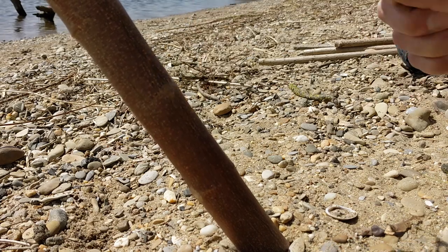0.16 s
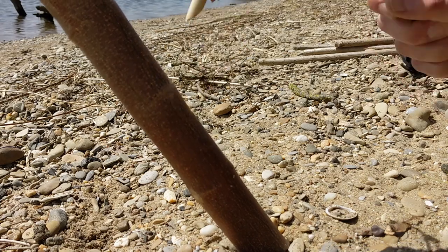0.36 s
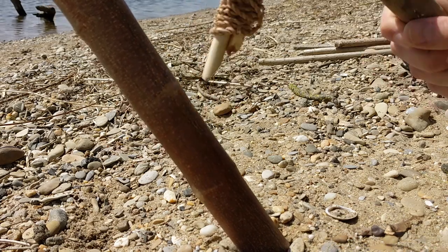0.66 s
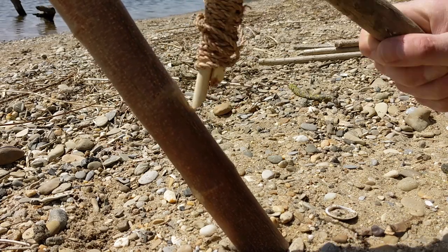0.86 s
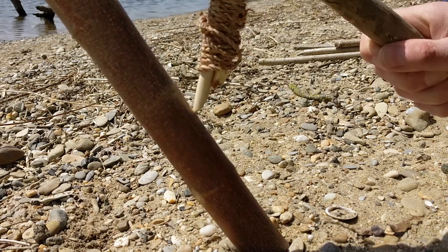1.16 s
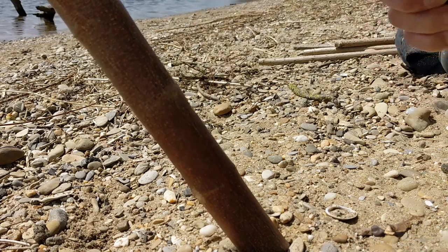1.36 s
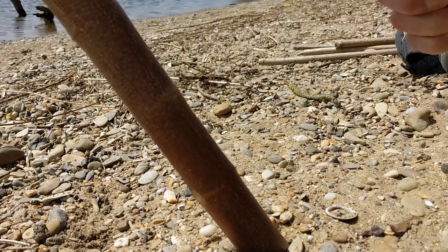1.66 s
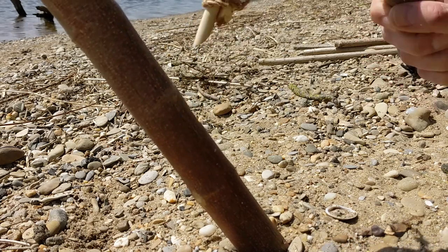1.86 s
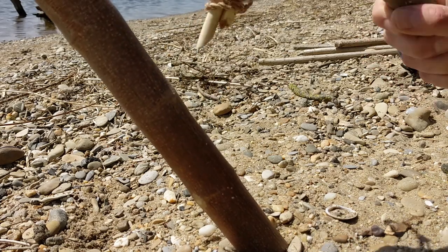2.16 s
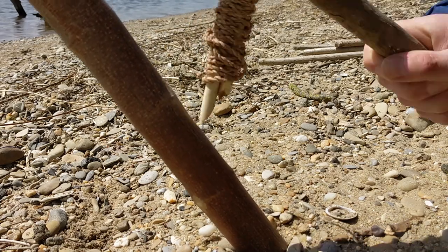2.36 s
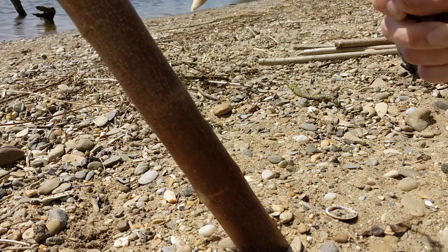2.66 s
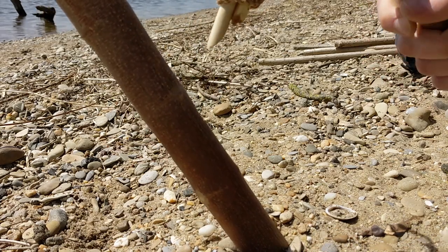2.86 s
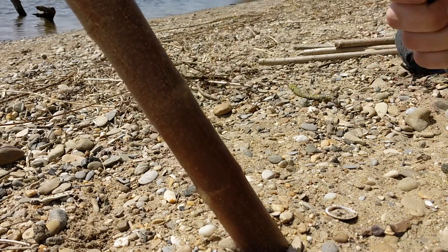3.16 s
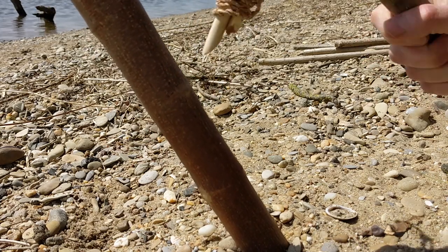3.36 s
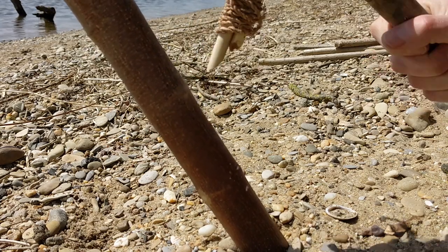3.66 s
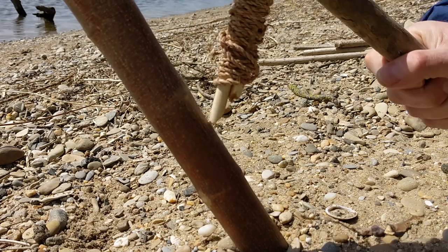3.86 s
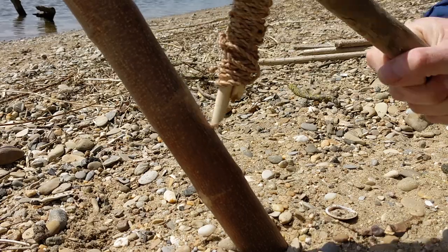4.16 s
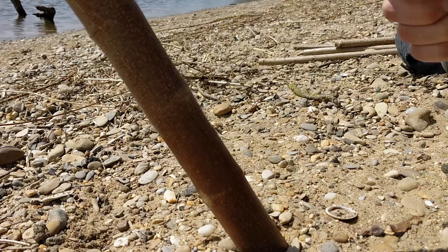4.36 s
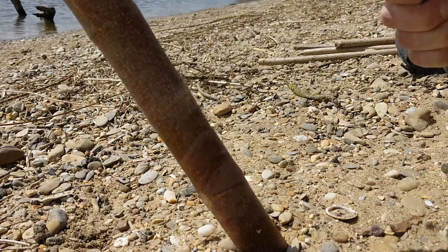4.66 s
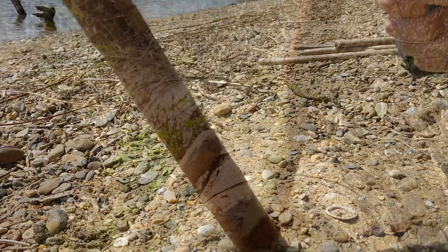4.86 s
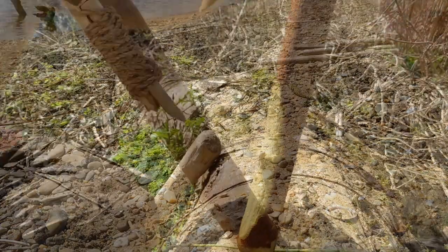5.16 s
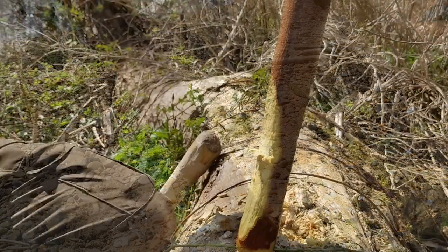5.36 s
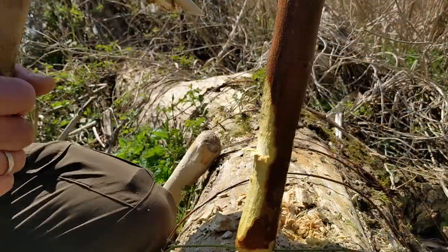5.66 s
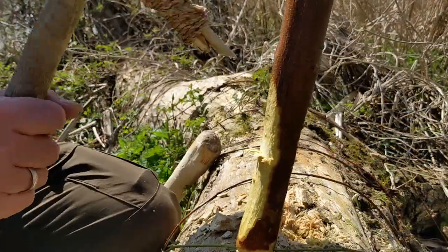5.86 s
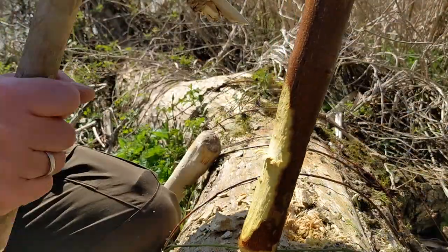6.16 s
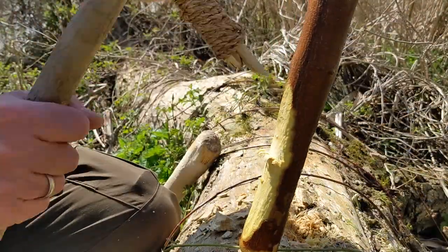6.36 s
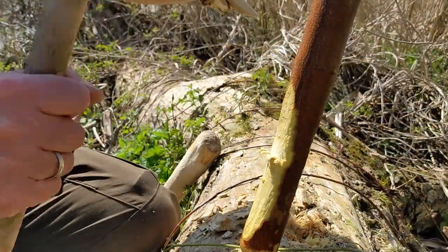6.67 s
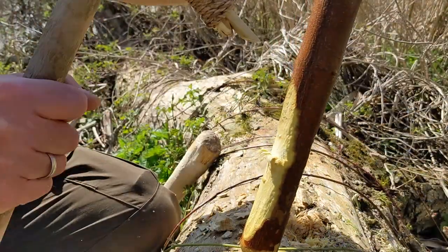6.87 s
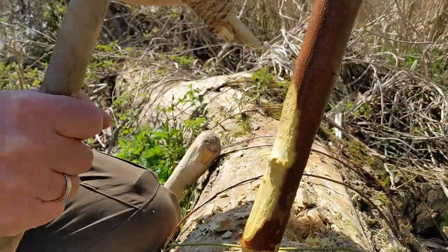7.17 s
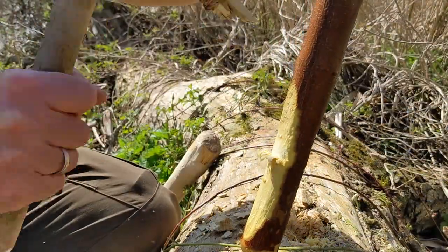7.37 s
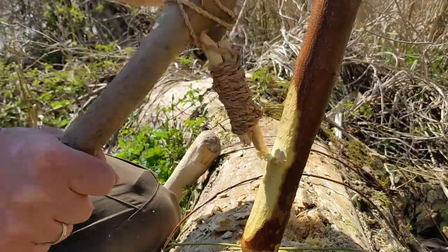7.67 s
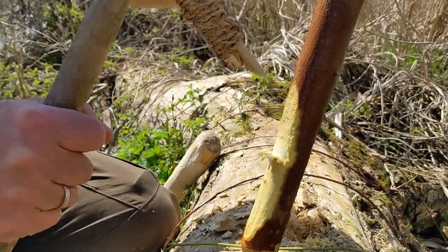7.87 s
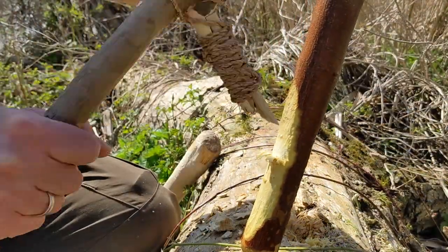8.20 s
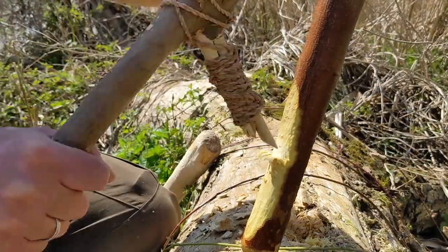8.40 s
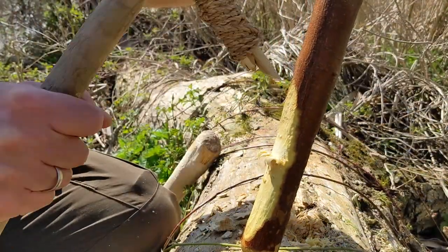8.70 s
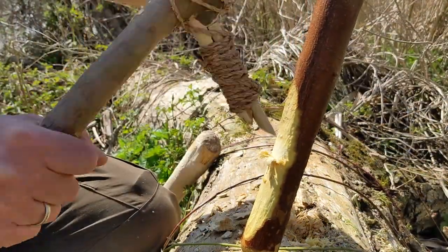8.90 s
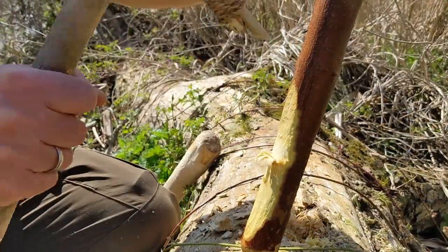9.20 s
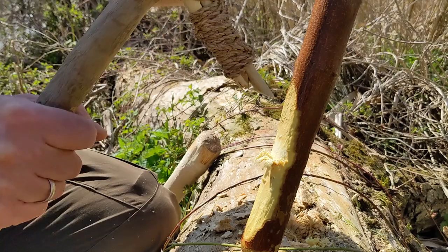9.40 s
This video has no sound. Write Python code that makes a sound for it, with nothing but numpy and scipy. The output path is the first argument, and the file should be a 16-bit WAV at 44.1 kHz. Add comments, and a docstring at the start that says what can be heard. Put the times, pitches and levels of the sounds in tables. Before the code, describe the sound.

A bone adze chops a wooden pole close by, about three strikes a second, each a bright crack with a short knock. Chips patter and the pole scrapes lightly in the shingle during a brief pause. The strikes fade out, then return faster, with a fuller, hollower knock as the pole stands on a log. Behind them is only a soft outdoor rumble and hiss, with a few faint, distant bird notes.

```python
"""A bone adze chops a wooden pole, first on a shingle beach, then, after a lull, on a fallen log.
Each bite snaps fibres, which ring blade and haft; the blow rings the pole's bending modes as a
knock and a thud. How the pole is held sets the thud's pitch and the balance of the parts.
Chips fall, sand trickles, the pole bumps and grinds in the grit.
Far birds call over a soft outdoor rumble and hiss."""
import sys
import numpy as np
from scipy import signal
from scipy.fft import rfft, irfft
from scipy.io import wavfile
from scipy.ndimage import uniform_filter1d

SR = 44100
rng = np.random.default_rng(int(sys.argv[2]) if len(sys.argv) > 2 else 0)


def store_pcm(level_fs):
    """Save levels as 16-bit WAV."""
    pcm = np.round(np.clip(level_fs, -1, 1) * 32767).astype(np.int16)
    wavfile.write(sys.argv[1], SR, np.atleast_2d(pcm).T)


N = 420713
SIZE, LEAD = 16384, 1024  # samples per event, samples before contact
AGE_S = (np.arange(SIZE) - LEAD) / SR  # time since contact
SIDES = np.array([[1], [-1]])  # left, right
PRESS_S, ON_LOG_S = 2.9, 5.7  # pole pressed into the shingle, pole stood on the log

# stereo phase on the beach: freq_hz, left_lead_rad
BEACH_PHASE = [(100, 0), (900, .3), (1700, 2), (2400, -1), (3100, -5), (3700, -4.8), (4300, -2.8),
               (6000, -2.8), (7600, -6.2), (11500, -3.8), (13500, -2.5), (15000, -.8)]


def beach_chop(bite_ms, pole_hz, thud_db, low_db, high_db, haft_db, crack_db, treble_db):
    """Blow on shingle: the stones damp the pole and scatter the crack brightly."""
    # cut through dry bark: freq_hz, gain_db
    bark = [(300, -13.5), (950, -11), (1300, -0.5), (1800, -5.5), (2500, 5.5), (4000, 1.5), (5200, -2),
            (6200, 0.5), (9000, -7), (12500, -10.5), (15000, -5.5), (16000, -12)]
    # low and high pole modes on shingle: freq_hz, level_db, t60_s, left_minus_right_db
    low_modes = [(268, -8, 0.013, -0.5), (388, -3.5, 0.033, -1), (472, 2, 0.035, 4.5)]
    high_modes = [(584, -1, 0.041, -2.5), (694, -8, 0.01, 5.5), (794, 3.5, .02, 11.5)]
    crack = bite(bark, bite_ms, haft_db, crack_db, treble_db, rise=.7, fall=.34)
    crack = stereo_phase(crack, BEACH_PHASE)
    low = knock(low_modes, low_db, push_s=-.0011, rebound_s=.0027, rebound_gain=.21)
    high = knock(high_modes, high_db - 2, push_s=-.00072, rebound_s=.0014, rebound_gain=.43)
    swing = thud(pole_hz, t60_s=7.5 / pole_hz, swell_s=7.4 / pole_hz, ground_gain=.2,
                 glide=308 / pole_hz - 1, glide_s=1.45 / pole_hz)  # falls from 308 Hz
    direct = crack + low + high
    stones = scatter(direct, t60_s=.1, db=-26, delay_s=.0057, lo_hz=1400, hi_hz=14900)
    shore = scatter(direct, t60_s=.35, db=-44.5, delay_s=.018, lo_hz=4000, hi_hz=12000)
    return direct + burst(swing, thud_db + .5) + stones + shore + chips(crack_db - 28.5)


def log_chop(bite_ms, pole_hz, thud_db, low_db, high_db, haft_db, crack_db, treble_db):
    """Blow on the log: the pole rings longer and hollower; brush returns a faint echo."""
    # cut through bare wood: freq_hz, gain_db
    bare_wood = [(300, -11.5), (900, 0), (1200, 0), (1700, -5.5), (2500, 6), (4000, 1.5), (6000, -3.5),
                 (8500, -0.5), (10500, -9.5), (12500, -10.5), (15000, -17), (16000, -20)]
    # stereo phase by the log: freq_hz, left_lead_rad
    log_phase = [(100, 0), (1300, .3), (1900, .6), (2200, 2), (2800, 1.6), (3200, -.5), (4100, -.8),
                 (4700, .8), (6000, -2), (7000, -4), (9000, -2), (11500, -1), (14000, .5)]
    # low and high pole modes on the log: freq_hz, level_db, t60_s, left_minus_right_db
    low_modes = [(249.3, -4, .07, 4.5), (284, -5, 0.051, 2.5), (358, -0.5, .065, -6),
                 (433, 3.5, 0.039, 8.5)]
    high_modes = [(612, -3, 0.05, 0), (744, 0.5, 0.031, -2), (751.3, 2.5, 0.035, -2), (866, -11, 0.006, 0)]
    crack = bite(bare_wood, bite_ms, haft_db, crack_db, treble_db, rise=.59, fall=.67)
    crack = stereo_phase(crack, log_phase)
    low = knock(low_modes, low_db + 2, push_s=-.00023, rebound_s=.002925, rebound_gain=.97)
    high = knock(high_modes, high_db - .3, push_s=-.00085, rebound_s=.005332, rebound_gain=.99)
    # the pole's foot crunches on the log's bark
    crunch = band(rng.standard_normal((2, SIZE)) * (fade(.05) - fade(.008)), 380, 950, order=2)
    swing = thud(pole_hz, t60_s=.14, swell_s=.05, ground_gain=.65, glide=1.5, glide_s=.003)
    swing = burst(swing, thud_db - 5) * undb(SIDES * -1.9)
    direct = crack + low + high + burst(crunch, high_db - 8)
    trunk = scatter(direct, t60_s=.035, db=-20.5, delay_s=.0022, lo_hz=500, hi_hz=2940)
    outward = colour(direct, [(1950, 0), (2320, -8), (2700, 0)])  # notch at the haft's ring
    brush = scatter(outward, t60_s=.063, db=-31, delay_s=.007, lo_hz=300, hi_hz=12000)
    echo = scatter(outward, t60_s=.12, db=-42, delay_s=.036, lo_hz=2200, hi_hz=3976)
    return direct + swing + trunk + brush + echo + chips(crack_db - 35)


def share_out(bite_ms, crack_db, knock_db, hold):
    """Pole pitch and part levels for one blow; a longer bite tears more fibres, adding treble."""
    pole_hz, thud_db, low_db, high_db, haft_db, treble_db = hold
    torn_db = 1.4 * np.log2(bite_ms / 1.8)
    return (pole_hz, knock_db + thud_db, knock_db + low_db, knock_db + high_db,
            crack_db + haft_db, crack_db, crack_db + treble_db + torn_db)


def bite(spectrum, bite_ms, haft_db, crack_db, treble_db, rise, fall):
    """Fibres snap as the edge sinks in, ringing blade and haft; rise and fall are in bite lengths."""
    # modes of the buried blade and of the haft: freq_hz, level_db, t60_s, left_minus_right_db
    blade_modes = [(2780, -2, .01, 4), (3330, -3, .009, -2), (4500, -6, .012, -4), (5250, -1, .011, 8),
                   (6790, 3, .022, -8), (7130, 0, .016, 4), (9530, -2, .016, -7), (11550, 1, .012, -7),
                   (14400, 1, .007, -6)]
    haft_modes = [(2320, 0, .012, 7), (2480, -6, .009, -3)]
    depth = AGE_S * 1000 / bite_ms
    envelope = np.exp(-np.where(depth < 0, np.abs(depth / rise) ** 1.2, np.abs(depth / fall)))
    # surface scratch before, parting splinters after
    envelope += .2 * np.exp(-np.abs(AGE_S) / np.where(AGE_S < 0, .0022, .003))
    envelope *= np.interp(depth, [-3, -1.2, -.8], [.55, .7, 1])
    snaps = grit(SIZE, spread_db=1.5) + .93 * rng.standard_normal((2, SIZE))
    force = colour(envelope * snaps, spectrum)
    blade = 0
    for hz, db, t60_s, pan_db in blade_modes:
        gain = undb(db + SIDES * pan_db / 2) * 2 * np.log(1000) / (t60_s * SR)
        blade += gain * fade(t60_s) * np.cos(2 * np.pi * hz * AGE_S)
    cut = force + through(force, blade)
    crack = colour(cut, [(6500, 0), (7500, -6), (9000, -40)])
    treble = (cut - crack) * undb(SIDES * -1.5)
    haft = through(force, ringing(haft_modes, spread_db=2, detune=.026))
    return burst(crack, crack_db) + burst(haft, haft_db + 3.5) + burst(treble, treble_db)


def knock(modes, db, push_s, rebound_s, rebound_gain):
    """The blow pushes the pole, which then kicks its support; both ring its bending modes."""
    kick_s = push_s + rebound_s * (1 + .072 * rng.standard_normal())
    force = sum(gain * np.exp(-.5 * ((AGE_S - at_s) / .00008) ** 2)
                for at_s, gain in [(push_s, 1), (kick_s, rebound_gain)])
    pole = through(force, ringing(modes, spread_db=1.2, detune=.02))
    return burst(band(pole, 210, 1100, order=2), db)


def thud(pole_hz, t60_s, swell_s, ground_gain, glide=.49, glide_s=.0067):
    """Slow bending waves arrive last, so pitch sinks to the lowest mode; the ground shakes along."""
    envelope = fade(t60_s) - fade(swell_s)
    pitch_hz = pole_hz * (1 + glide * np.exp(-np.maximum(AGE_S, 0) / glide_s))
    swing = np.sin(2 * np.pi * np.cumsum(pitch_hz * (AGE_S >= 0)) / SR)
    ground = level(band(stereo_noise(SIZE, width=.5), 33, 200, order=2), 0)
    return band(envelope * (swing + ground_gain * ground), 70, 900, order=3)


def ping(db):
    """The bone blade rings on once clear of the cut."""
    # free blade modes: freq_hz, level_db, t60_s, left_minus_right_db
    modes = [(4840, 0, .11, -3), (6850, 0, .055, -6), (14500, 0, .05, -6)]
    return burst(ringing(modes, spread_db=1, detune=.001), db)


def chips(db, count=8):
    """Chips and sand shaken loose by a blow patter down."""
    drops = np.zeros(SIZE)
    for lateness, smallness in rng.random((count, 2)):
        delay_s = .012 + .07 * lateness ** 2
        drops[LEAD + int(delay_s * SR)] += undb(-10 * smallness - 18 * lateness)
    click = band(rng.standard_normal((2, SIZE)) * fade(.007), 4500, 12000, order=1)
    return through(burst(click, db - 2), drops)


def tick(db, hz):
    """A chip or pebble clicks and rings for a few milliseconds."""
    click = rng.standard_normal(SIZE) * (fade(.0038) - fade(.0027))
    ring = band(click, hz / 1.15, hz * 1.15, order=1)
    sound = ring + .5 * band(click, .25 * hz, 16000, order=2)
    sound = stereo_phase(sound * undb(db + 2) / np.abs(sound).max(), BEACH_PHASE)
    return sound + scatter(sound, t60_s=.08, db=-17.5, delay_s=.003, lo_hz=1500, hi_hz=14000)


def scrape(length_s, db, tilt_db_per_octave):
    """Wood on bark and grit: dense uneven grains swell and fade with the stroke."""
    grains = band(grit((2, SIZE), spread_db=10.5), 1100, 19400, order=2)
    grains = colour(grains, [(1000, 0), (16000, 4 * tilt_db_per_octave)])
    return level(grains, db) * np.sin(np.pi * np.clip(AGE_S / length_s, 0, 1))


def sand(rate_hz=18, db=-58, spread_db=6):
    """Single grains settle in the shingle while the pole stands there."""
    falls = (rng.random(N) < rate_hz / SR) & (np.arange(N) < ON_LOG_S * SR)
    grain_db = db + spread_db * np.minimum(rng.standard_normal((2, N)), 2)
    click = band(rng.standard_normal(SIZE) * fade(.009), 5000, 12000, order=1)[LEAD:]
    return signal.fftconvolve(falls * undb(grain_db), click[None], axes=-1)[:, :N]


def bird(length_s, start_hz, end_hz, db):
    """One gliding, slightly wavering far whistle."""
    progress = np.clip(AGE_S / length_s, 0, 1)
    waver = .005 * level(band(rng.standard_normal(SIZE), 20, 90, order=1), 0)
    pitch_hz = (start_hz + (end_hz - start_hz) * progress) * (1 + waver)
    phase_rad = 2 * np.pi * np.cumsum(pitch_hz) / SR + .5 * SIDES
    return undb(db) * np.sin(np.pi * progress) * np.sin(phase_rad)


def air():
    """Distant rumble and thin hiss waver; the hiss swells once between beach and log."""
    # open-air spectra: freq_hz, density_db
    rumble_spectrum = [(21, -35.5), (35, -2), (93, 3), (364, -14.5), (443, -10.5), (549, -16.5),
                       (669, -15.5), (946, -25), (1010, -23), (1410, -23.5), (1580, -37.5), (1800, -28.5),
                       (2340, -61), (3960, -120)]
    hiss_spectrum = [(900, -31), (1600, -10), (2500, 2.5), (4000, -1), (5500, -5), (7000, 0), (10000, -5),
                     (14000, -2), (16000, -8)]
    time_s = np.arange(N) / SR
    blend_s = (4.7, 6.4)  # beach to log
    swell_db = 5 * np.exp(-((time_s - 5.45) / .56) ** 2)
    rumble_db = np.interp(time_s, blend_s, (-59, -55))
    hiss_db = np.interp(time_s, blend_s, (-73, -71)) + swell_db
    rumble = level(colour(stereo_noise(N, width=.35), rumble_spectrum), 0)
    rumble = band(rumble, 55, 4000, order=3)
    hiss = level(colour(stereo_noise(N, width=.09), hiss_spectrum), 0)
    return rumble * undb(rumble_db + 2.2 * walk(14)) + hiss * undb(hiss_db + 2.1 * walk(14))


def ringing(modes, spread_db, detune):
    """Modal response; each blow lands on another spot and excites the modes differently."""
    response = 0
    for hz, db, t60_s, pan_db in modes:
        gain = undb(db + spread_db * rng.standard_normal() + SIDES * pan_db / 2)
        pitch_hz = hz * (1 + detune * rng.standard_normal())
        response += gain * fade(t60_s) * np.sin(2 * np.pi * pitch_hz * AGE_S)
    return response


def scatter(sound, t60_s, db, delay_s, lo_hz, hi_hz):
    """Diffuse reflections, different on each side; db sets the response's energy."""
    response = band(rng.standard_normal((2, SIZE)), lo_hz, hi_hz, order=1) * fade(t60_s, delay_s)
    return through(sound, response * undb(db) / np.sqrt(np.sum(response ** 2) / 2))


def grit(shape, spread_db):
    """Noise with uneven grain sizes."""
    return rng.standard_normal(shape) * undb(spread_db * rng.standard_normal(shape))


def stereo_noise(size, width):
    """White noise; width is the side-to-mid ratio."""
    return rng.standard_normal(size) + width * SIDES * rng.standard_normal(size)


def walk(rate_hz):
    """Random steps, smoothed twice."""
    hold = int(SR / rate_hz)
    steps = np.repeat(rng.standard_normal(N // hold + 1), hold)
    return uniform_filter1d(uniform_filter1d(steps, hold), hold)[:N]


def undb(db):
    return 10 ** (np.asarray(db) / 20)


def level(x, db):
    """Set the rms of a steady sound."""
    return x * undb(db) / np.sqrt(np.mean(x ** 2))


def burst(x, db):
    """Set the energy of a short sound, as rms over 20 ms."""
    return x * undb(db) / np.sqrt(np.mean(np.sum(x ** 2, axis=-1)) / (SR / 50))


def fade(t60_s, delay_s=0):
    """Exponential decay from delay_s after contact."""
    return (AGE_S >= delay_s) * undb(-60 * np.maximum(AGE_S - delay_s, 0) / t60_s)


def band(x, lo_hz, hi_hz, order):
    """Causal band-pass."""
    sos = signal.butter(order, [lo_hz, min(hi_hz, SR / 2 - 100)], "band", fs=SR, output="sos")
    return signal.sosfilt(sos, x)


def per_bin(table, size):
    """Interpolate a (freq_hz, value) table at each FFT bin."""
    hz, value = np.transpose(table)
    return np.interp(np.log(np.fft.rfftfreq(size, 1 / SR) + 1), np.log(np.abs(hz) + 1), value)


def colour(x, table):
    """Filter by a (freq_hz, gain_db) table."""
    return irfft(rfft(x) * undb(per_bin(table, x.shape[-1])), x.shape[-1])


def stereo_phase(x, table):
    """Phase shift between the two microphone ports."""
    return irfft(rfft(x) * np.exp(.5j * SIDES * per_bin(table, SIZE)))


def through(x, response):
    """Convolve with a response on the AGE_S axis."""
    return signal.fftconvolve(np.atleast_2d(x), np.atleast_2d(response), axes=-1)[:, LEAD:LEAD + SIZE]


def add(out, contact_s, sound):
    """Mix in an event with its contact at contact_s."""
    start = int(contact_s * SR) - LEAD
    lo, hi = max(start, 0), min(start + SIZE, N)
    out[:, lo:hi] += sound[:, lo - start:hi - start]


def scene():
    """Chops, handling noise and birds over sand and open air."""
    # adze blows: start_s, bite_ms, crack_db, knock_db
    blows = [(0.2703, 4.4, -23, -37.5), (0.5662, 5.4, -25.5, -50.5), (0.9065, 5.5, -24.5, -36),
             (1.2029, 1.9, -19.5, -36.5), (1.5038, 3.2, -17.5, -33.5), (1.797, 2, -18, -37),
             (2.0889, 3.9, -21.5, -36), (2.3827, 4.55, -18, -34.5), (3.3058, 4.4, -23.5, -33.5),
             (3.603, 5.2, -23, -54.5), (3.8971, 1.33, -18, -32.5), (4.192, 1.8, -18.5, -33.5),
             (4.478, 3.05, -18, -31.5), (4.7755, 1.9, -20.5, -31), (5.0677, 1.36, -24.5, -36.5),
             (5.3593, 1.2, -32, -48), (6.0337, 2.5, -25.5, -29.5), (6.2853, 3, -19.5, -23.5),
             (6.5311, 2.24, -17.5, -24), (6.761, 1.2, -17.5, -24.5), (6.9973, 2.65, -16.5, -23.5),
             (7.2308, 2, -18.5, -22.5), (7.462, 1.54, -19.5, -23.5), (7.693, 4.3, -20, -26),
             (7.712, 1.2, -28, -35), (7.9304, 2.1, -21, -30.5), (8.1656, 2.5, -17, -23),
             (8.403, 3.85, -17.5, -26), (8.6331, 1.7, -22, -26), (8.859, 4.05, -20, -26.5),
             (9.1037, 2.76, -18, -26.5), (9.3409, 2.44, -19, -24.5)]
    # pole holds: pole_hz, thud_db, low_db, high_db (re knock), haft_db, treble_db (re crack)
    loose = (113, -4.5, -0.5, 2, -6.5, -7.5)
    pressed = (171, 2, 0, -3, -17.5, -6.5)
    on_log = (115, -0.5, -1, 3, -5.5, -10)
    # blade springs right out of the cut: start_s, level_db
    pings = [(2.383, -33), (5.068, -48)]
    # loudest chips and pebbles: start_s, level_db, pitch_hz
    ticks = [(0.19, -47, 2840), (1.5366, -33, 2600), (1.6552, -37, 13700), (1.8184, -20.5, 6740),
             (2.5301, -33, 14200), (2.7358, -25, 6270), (2.886, -42, 7060), (3.2317, -24.5, 13000),
             (4.344, -32.5, 9000), (4.406, -35, 14700), (5.4323, -38.5, 12660), (6.9, -37.5, 12800)]
    # pole bumps the ground: start_s, level_db, pitch_hz
    bumps = [(0.065, -52.5, 133), (0.614, -46, 143), (2.53, -49.5, 109)]
    # wood scrapes on bark and grit: start_s, length_s, level_db, tilt_db_per_octave
    scrapes = [(0.558, 0.058, -42, -6.5), (0.597, 0.14, -65, -7), (2.539, 0.17, -49, 0.5),
               (2.689, 0.11, -52.5, -4), (2.76, 0.26, -66.5, -1), (5.123, 0.17, -58.5, 1),
               (5.595, 0.056, -58, -6)]
    # far bird notes: start_s, length_s, start_hz, end_hz, level_db
    birds = [(5.36, .14, 2380, 2300, -68), (5.62, .17, 2290, 2350, -63), (5.915, .055, 5400, 4900, -67),
             (6.055, .05, 5250, 4900, -67)]
    out = air() + sand()
    for start_s, bite_ms, crack_db, knock_db in blows:
        if start_s < ON_LOG_S:
            parts = share_out(bite_ms, crack_db, knock_db, loose if start_s < PRESS_S else pressed)
            add(out, start_s, beach_chop(bite_ms, *parts) + ping(crack_db - 33))
        else:
            parts = share_out(bite_ms, crack_db, knock_db, on_log)
            add(out, start_s, log_chop(bite_ms, *parts))
    for start_s, db in pings:
        add(out, start_s, ping(db))
    for start_s, db, hz in ticks:
        add(out, start_s, tick(db, hz))
    for start_s, db, hz in bumps:
        add(out, start_s, burst(thud(hz, t60_s=.09, swell_s=.0068, ground_gain=.47), db))
    for start_s, *stroke in scrapes:
        add(out, start_s, scrape(*stroke))
    for start_s, *note in birds:
        add(out, start_s, bird(*note))
    return out


def record(dry):
    """Clip at full scale, then low-pass at 15.8 kHz."""
    lowpass = signal.ellip(8, .2, 80, 15800, fs=SR, output="sos")
    return signal.sosfilt(lowpass, np.clip(dry, -1, 1))


dry = scene()
out = record(dry)
store_pcm(out)
```